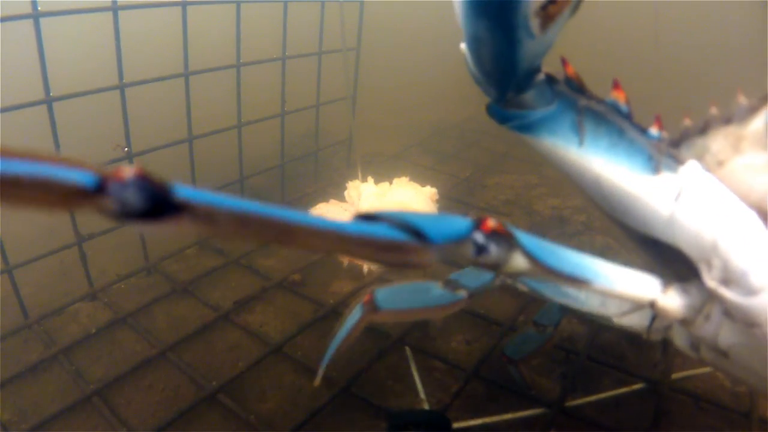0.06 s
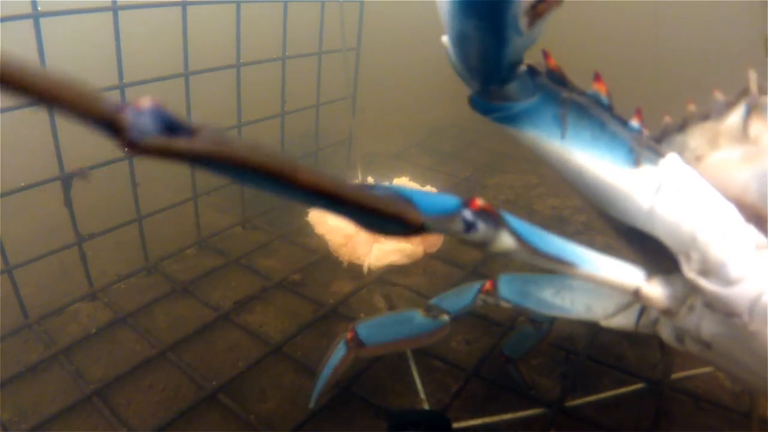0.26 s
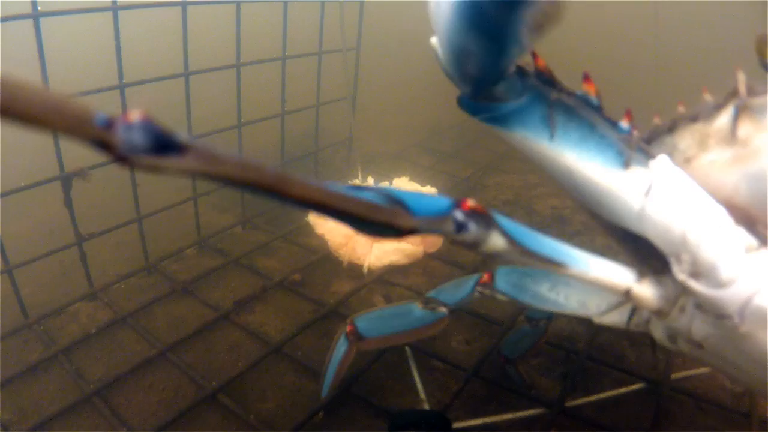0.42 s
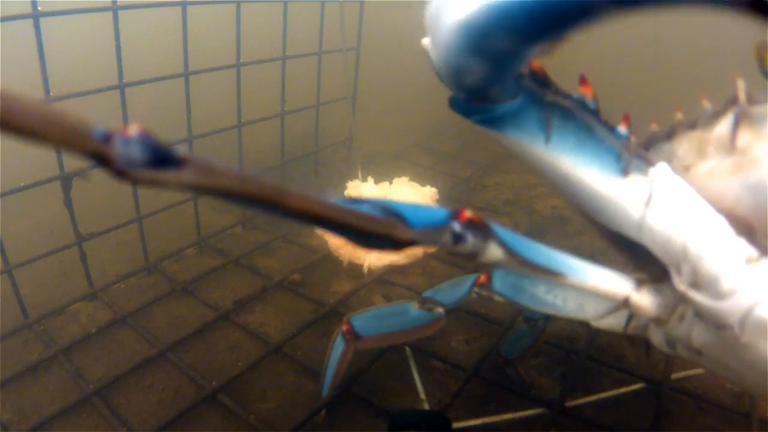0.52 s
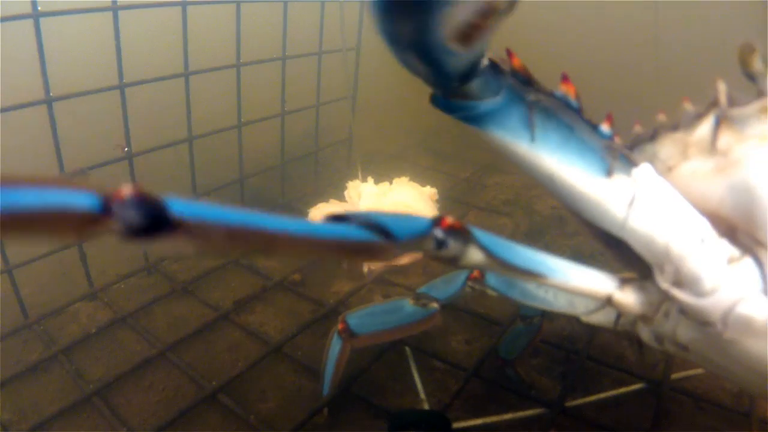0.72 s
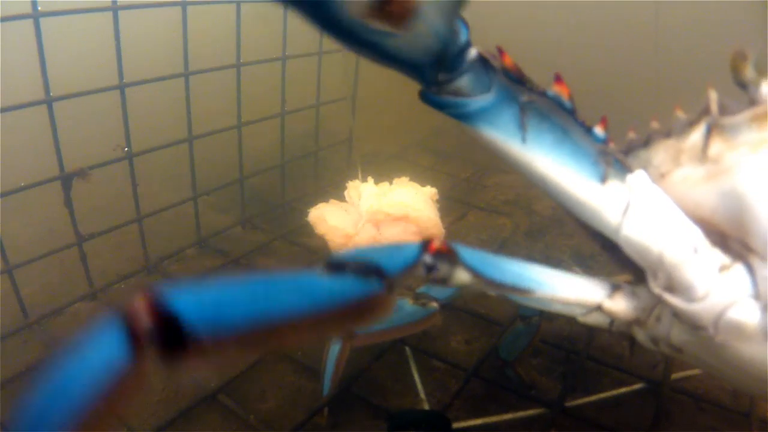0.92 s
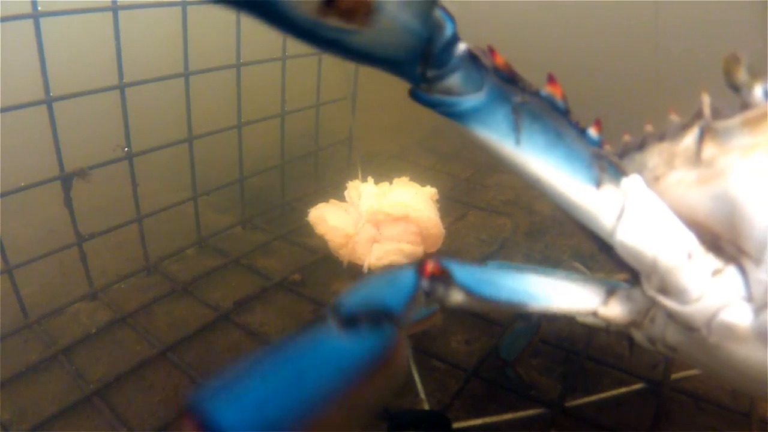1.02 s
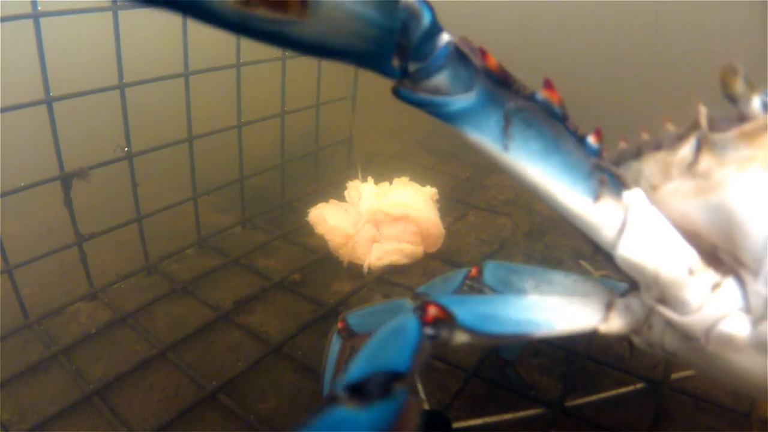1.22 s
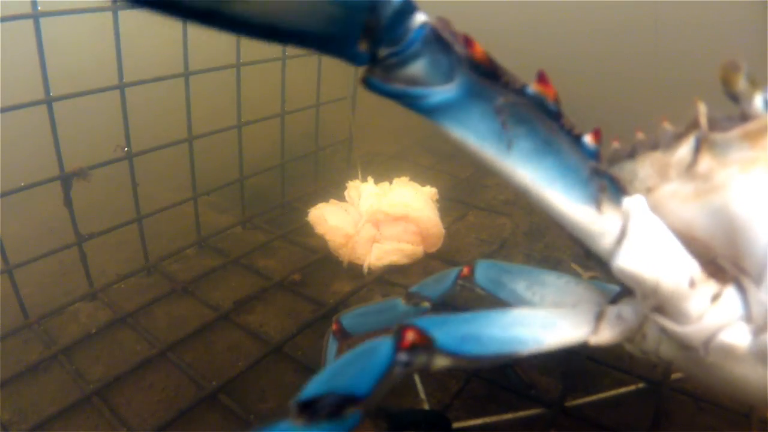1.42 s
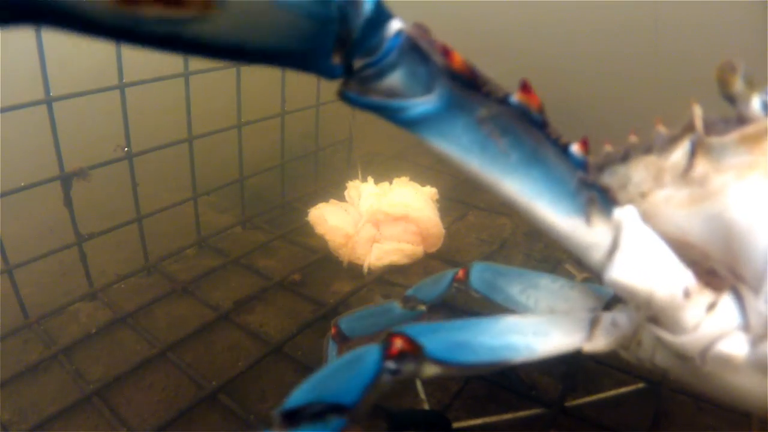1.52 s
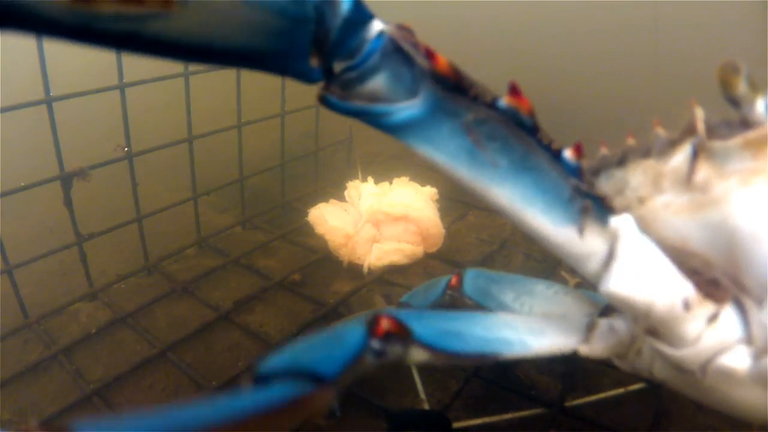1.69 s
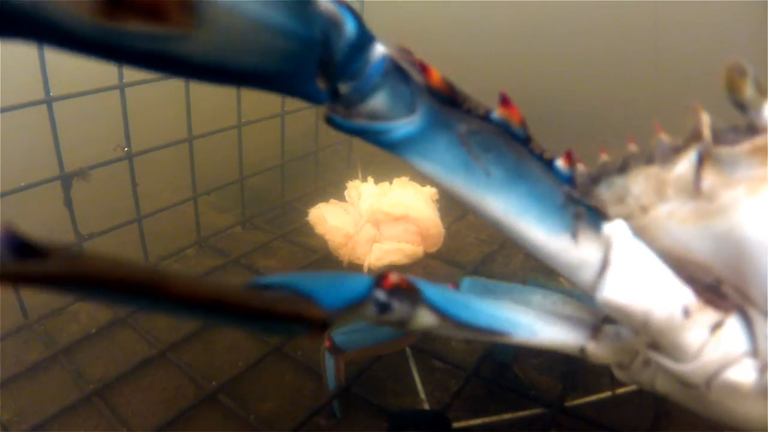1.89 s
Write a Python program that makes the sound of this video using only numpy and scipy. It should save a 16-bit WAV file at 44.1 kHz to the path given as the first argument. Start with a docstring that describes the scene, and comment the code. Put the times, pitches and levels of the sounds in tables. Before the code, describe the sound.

Sharp, hollow knocks come unevenly as a crab climbs over the plastic case around the microphone, with brief leg chirps and brushes, then a rasp of shell. Behind them a wire trap hums faintly in a soft underwater wash.

```python
"""Sharp, hollow taps and scrapes, very close: under water, a crab in a wire trap walks over a plastic
camera housing, heard from inside it. Each tap rings the housing for a few milliseconds, coloured by
where and how hard the shell lands. Leg tips stick and slip in short chirps, legs brush the case and
the shell grates along it. Behind them the shaken trap rings faintly and hums over a wash of water."""
import sys
import numpy as np
from scipy import signal
from scipy.fft import rfft, irfft, next_fast_len
from scipy.io import wavfile

SR = 44100
rng = np.random.default_rng(int(sys.argv[2]) if len(sys.argv) > 2 else 0)


def generate_wav(sig):
    """Save sig (samples, or channels by samples) to the path in sys.argv[1] as 16-bit PCM at SR."""
    pcm = np.round(np.clip(np.atleast_2d(sig).T, -1, 1) * 32767).astype(np.int16)
    wavfile.write(sys.argv[1], SR, pcm)


N = 85995
TAP_S, LEVEL_WINDOW_S = .09, .01  # length of one contact; its level is its energy spread over the window


def amp(db):
    """Decibels to gain."""
    return 10 ** (np.asarray(db, float) / 20)


def unit(x):
    """Scale to an energy of 1."""
    return x / np.sqrt(np.sum(x ** 2) + 1e-20)


def fade(t, t60):
    """Exponential decay, 60 dB down after t60."""
    return np.exp(-np.log(1000) * t / t60)


def through(x, response):
    """Play x through an impulse response."""
    return signal.fftconvolve(x, response)[:len(x)]


def low_cut(x, edge_hz):
    """Roll off the lows below an edge."""
    return signal.sosfilt(signal.butter(3, edge_hz, "highpass", fs=SR, output="sos"), x)


def colour(x, curve):
    """Minimum-phase EQ that follows a curve of (f/Hz, gain/dB) points."""
    size = 2 * next_fast_len(len(x))
    hz, db = np.array(curve, float).T
    bin_hz = np.arange(size // 2 + 1) * SR / size
    gain = amp(np.interp(np.log(bin_hz + 1), np.log(hz), db))
    cepstrum = irfft(np.log(gain))
    cepstrum[1:size // 2] *= 2  # folded forward, so nothing rings ahead of the attack
    cepstrum[size // 2 + 1:] = 0
    return irfft(rfft(x, size) * np.exp(rfft(cepstrum)))[:len(x)]


def ring(modes, length_s, scatter_db=0):
    """Decaying modes after one push, with an optional random spread in level."""
    t = np.arange(int(length_s * SR)) / SR
    out = np.zeros(len(t))
    for hz, db, t60 in modes:
        partial = unit(np.sin(2 * np.pi * hz * t) * fade(t, t60))
        out -= amp(db + scatter_db * rng.standard_normal()) * partial
    return out


def burst(curve, t60, length_s):
    """Resonances too dense to tell apart: coloured noise that dies away."""
    t = np.arange(int(length_s * SR)) / SR
    return unit(colour(rng.standard_normal(len(t)) * fade(t, t60), curve))


def stroke(t, swell, release, rise_db=12, fall_db=26):
    """Pressure of a moving leg: up by rise_db over the swell, then down by fall_db per release time."""
    return amp(-np.maximum(rise_db * (1 - t / swell), fall_db * (t - swell) / release))


def add(out, start, x):
    """Mix x in at a start time in seconds."""
    i = max(int(start * SR), 0)
    out[i:i + len(x)] += x[:max(len(out) - i, 0)]


# EQ of still water and hiss: f/Hz, gain/dB
WATER_EQ = [(25, 4.5), (76, 7.5), (120, 3), (200, -5), (600, -18.5), (1200, -17), (2400, -21),
            (6000, -33), (13000, -32.5), (16000, -42)]


def water(level_db=-64):
    """The bed: a faint, steady wash of dark noise."""
    return amp(level_db) * np.sqrt(N) * unit(colour(rng.standard_normal(N), WATER_EQ))


# jolts of the whole trap: t/s, hum level/dB
TRAP_JOLTS = [(.22, -47), (.87, -52), (.955, -61), (1.165, -32.5), (1.32, -54), (1.385, -45.5),
              (1.465, -53.5), (1.69, -52)]


def trap_hum(hz=78.2, rise_s=.021, t60=.8):
    """The whole trap hums on one low note that blooms and fades after each jolt."""
    t = np.arange(N) / SR
    envelope = np.zeros(N)
    for start, db in TRAP_JOLTS:
        age = np.maximum(t - start, 0)
        envelope += amp(db) * (1 - np.exp(-age / rise_s)) * fade(age, t60)
    return np.sqrt(2) * envelope * np.sin(2 * np.pi * hz * t)


# EQ of the wire mesh's dense tail: f/Hz, gain/dB
MESH_EQ = [(60, -14), (110, -12), (170, 3.5), (400, 1), (650, -5.5), (1000, -7), (1500, -16), (2300, -19.5),
           (3500, -20.5), (6000, -36), (11000, -5.5), (15000, -19)]
# clearest notes in that tail: f/Hz, level/dB, t60/s
MESH_NOTES = [(483.3, -17, 0.23), (595.8, -6, 0.18), (723, -9, 0.11), (958, -13, 0.17), (1260, -18.5, .15)]


def wire_mesh(shake, return_db=-14.5):
    """The mesh rings on after each blow, like a faint metallic reverb."""
    tail = burst(MESH_EQ, t60=.76, length_s=1) + ring(MESH_NOTES, length_s=1)
    return amp(return_db) * through(shake, tail)


# soft brushes of a leg: t/s, swell/s, release/s, rub level/dB, scratch level/dB
SCUFF_CUES = [(0, 0.0049, .008, -48.5, -51.5), (0.02, 0.013, 0.018, -53.5, -53.5),
              (0.19, 0.021, 0.028, -46.5, -64.5), (0.264, 0.034, 0.022, -80, -58),
              (.358, 0.0044, 0.022, -64.5, -62.5), (0.41, 0.011, 0.0041, -33, -57),
              (0.445, 0.0074, 0.0099, -55, -45.5), (0.4651, .001, 0.018, -64, -44.5),
              (.605, 0.0034, 0.017, -36.5, -63), (0.742, 0.033, 0.09, -54, -84),
              (0.789, 0.0036, 0.069, -52.5, -56.5), (0.799, 0.0031, 0.074, -47.5, -75.5),
              (.90, 0.041, 0.056, -48, -66), (1.171, 0.0047, 0.054, -31, -47),
              (1.85, 0.0048, 0.012, -50, -58), (1.874, 0.0065, .008, -59, -72)]
# EQs of the dull rub and of the fine scratch: f/Hz, gain/dB
RUB_EQ = [(60, -23.5), (170, -1.5), (300, 3.5), (450, -9), (620, 1), (900, -13), (2000, -43), (5000, -89)]
SCRATCH_EQ = [(150, -27), (600, -8), (1300, 5.5), (2300, 7), (3200, -7.5), (3900, -3), (5500, -19),
              (8000, -19.5), (10000, -9), (13000, -9), (14700, -26), (16000, -43)]


def scuffs():
    """A leg brushes the case too lightly to catch: a dull rub with a fine scratch on top."""
    out, t = np.zeros(N), np.arange(N // 12) / SR
    for start, swell, release, rub_db, scratch_db in SCUFF_CUES:
        rub = amp(rub_db) * unit(colour(rng.standard_normal(len(t)), RUB_EQ))
        scratch = amp(scratch_db) * unit(colour(rng.standard_normal(len(t)), SCRATCH_EQ))
        add(out, start, (rub + scratch) * np.sqrt(len(t)) * stroke(t, swell, release))
    return out


# pitched accents on a few taps: t/s, f/Hz, level/dB, t60/s
PING_CUES = [(0.0101, 312, -35, 0.039), (.116, 322, -50.5, 0.035), (.2275, 719, -19.5, 0.015),
             (.229, 890, -53, 0.75), (.332, 2617, -37, 0.019), (0.61, 290, -59, 0.015),
             (.8525, 692, -36.5, 0.086), (1.5466, 1800, -26.5, 0.015)]


def pings():
    """A hollow leg segment or a plucked wire rings at its own pitch."""
    out = np.zeros(N)
    for start, hz, db, t60 in PING_CUES:
        add(out, start, ring([(hz, db, t60)], length_s=.5) * np.sqrt(LEVEL_WINDOW_S * SR))
    return low_cut(out, edge_hz=180)


# leg-tip chirps: t/s, swell/s, release/s, bright level/dB, body against bright/dB, slip rate/Hz
CHIRP_CUES = [(0.552, 0.0035, .005, -49, 22, 600), (0.563, 0.017, .014, -46.5, 7, 990),
              (.625, 0.041, .015, -56.5, 0, 400), (0.661, 0.0079, 0.0052, -44.5, -8, 800),
              (.673, 0.014, .011, -35, -6, 990), (0.8508, 0.0006, .004, -29.5, -7.5, 1550),
              (0.894, 0.027, .008, -55, 0, 570), (1.254, 0.0054, .005, -35.5, 2.5, 490),
              (1.305, 0.0057, .007, -41.5, 8.5, 830)]
# low and high modes that a slipping tip rings: f/Hz, relative level/dB, t60/s
TIP_BODY_MODES = [(595, 0, .025), (680, -1, .028)]
TIP_BRIGHT_MODES = [(1356, -4, 0.013), (2450, -2.5, 0.03), (3732, 2.5, 0.021), (8200, -4, 0.019),
                    (12000, -15, .02), (13000, -17.5, 0.018)]
# EQ of the tip's rasp: f/Hz, gain/dB
RASP_EQ = [(200, -29), (700, 7.5), (1200, -0.5), (1700, -4.5), (2000, -18), (2600, -12), (3300, -19),
           (4700, -23), (6000, -20), (8000, -14.5), (10000, -22), (13500, -26), (16000, -40.5)]


def chirps(slip_count=120, jitter=.15, scatter_db=4, rasp_db=2.5, edge_hz=560):
    """A leg tip sticks and slips: a run of uneven pulses swells and lets go, ringing its modes."""
    out = np.zeros(N)
    for start, swell, release, db, body_db, rate in CHIRP_CUES:
        gap_spread, force_spread = rng.standard_normal((slip_count, 2)).T
        slip_times = np.concatenate([[0], np.cumsum(np.exp(jitter * gap_spread[1:]))]) / rate
        force = amp(scatter_db * force_spread) * stroke(slip_times, swell, release)
        slips = np.bincount((slip_times * SR).astype(int), weights=force, minlength=N // 4)
        high_ring = ring(TIP_BRIGHT_MODES, TAP_S)
        rasp = amp(rasp_db) * burst(RASP_EQ, t60=.034, length_s=TAP_S)
        bright = unit(low_cut(through(slips, high_ring + rasp), edge_hz))
        body = unit(low_cut(through(slips, ring(TIP_BODY_MODES, TAP_S)), edge_hz))
        add(out, start, amp(db) * np.sqrt(LEVEL_WINDOW_S * SR) * (bright + amp(body_db) * body))
    return out


# fader ride of the shell's drag along the case: t/s, level/dB
GRATE_RIDE = [(1.457, -81), (1.468, -30.5), (1.493, -45), (1.529, -37.5), (1.575, -63), (1.605, -37),
              (1.66, -42), (1.722, -53), (1.78, -53.5), (1.815, -94), (1.875, -58.5), (1.908, -98)]


def grating(points=3, catches_per_s=560, scatter_db=4.5):
    """Rough shell drags over the case at a few points: dense little catches, each ringing it."""
    times, levels_db = np.array(GRATE_RIDE).T
    pressure = np.interp(np.arange(N) / SR, times, amp(levels_db), left=0)
    out = np.zeros(N)
    for _ in range(points):
        catches = rng.random(N) < catches_per_s / points / SR
        strength = amp(scatter_db * np.clip(rng.standard_normal(N), -2, 2))
        polarity = rng.choice([-1, 1], N)
        force = np.sqrt(N / points) * unit(catches * strength) * polarity * pressure
        case = housing_knock(levels_db=[-8, 1.5, -4.5, -7.5, -23.5, -17], edge_hz=93)
        out += through(force, unit(case))
    return out


# modes of the plastic housing: f/Hz, relative level/dB, t60/s
HOUSING_MODES = [(202, -14.5, 0.031), (326, -3.5, 0.009), (598, 0.5, 0.017), (681, -7, 0.034),
                 (740.5, -13.5, 0.066), (862, -10.5, 0.0095), (944.6, -1.5, 0.023), (1290, -17, 0.035),
                 (1480, -10.5, .007), (1740, -12, 0.011), (2217, -13, .026), (2620, -24, 0.021)]
# EQ of the crack, the case's dense upper resonances: f/Hz, gain/dB
CRACK_EQ = [(100, -18), (600, -16), (1000, 10), (2000, 5.5), (3300, -8), (4800, -11), (5500, -28),
            (6200, -29), (7400, -16.5), (8700, -20.5), (10500, -16), (12700, -13.5), (14500, -19),
            (15500, -29.5), (16300, -32)]
# bands of a knock (thud, hollow knock, wall ring, crack, snap, tick): low f/Hz, high f/Hz
KNOCK_BANDS = [(100, 450), (450, 800), (800, 1400), (1400, 2900), (2900, 5500), (7000, 16000)]


def housing_knock(levels_db, edge_hz, eq_passes=3):
    """One contact rings the housing; smooth EQ pulls each band towards its given level."""
    body = ring(HOUSING_MODES, TAP_S, scatter_db=1.5)
    crack = amp(-1.5) * burst(CRACK_EQ, t60=.016, length_s=TAP_S)
    knock = low_cut(body + crack, edge_hz)
    hz = np.arange(len(knock) // 2 + 1) * SR / len(knock)
    for _ in range(eq_passes):
        power = 2 * np.abs(rfft(knock)) ** 2 / (len(knock) * LEVEL_WINDOW_S * SR)
        curve = []
        for (low, high), db in zip(KNOCK_BANDS, levels_db):
            band_db = 10 * np.log10(power[(hz >= low) & (hz < high)].sum())
            curve.append((np.sqrt(low * high), db - band_db))
        knock = colour(knock, curve)
    return knock


# leg hits: t/s, thud/dB, hollow knock/dB, wall ring/dB, crack/dB, snap/dB, tick/dB,
# low cut/Hz (lower as the whole case gives), send to the mesh/dB
TAP_CUES = [(0.011, -39, -35, -45.5, -53.5, -70, -56.5, 266, -38.5),
            (0.117, -63, -57.5, -64, -73, -88, -75, 284, -34),
            (0.2102, -39.5, -22.5, -36, -37.5, -51, -45, 131, -29.5),
            (0.217, -22, -17.5, -28, -30, -32, -36.5, 92, -32.5),
            (0.2268, -27.5, -22, -41.5, -33, -39.5, -37.5, 30.5, -51),
            (0.253, -79, -76, -59, -56, -70, -67.5, 130, -27),
            (0.2915, -77, -76, -55.5, -50, -58, -58.5, 130, -24),
            (0.3327, -52, -41.5, -57.5, -43.5, -45.5, -45.5, 130, -19),
            (0.421, -37, -39, -62, -55, -76, -60, 224.5, -42),
            (0.4242, -35, -33.5, -57.5, -53, -66.5, -57, 218, -47),
            (0.433, -33.5, -35.5, -51.5, -59, -71, -58, 224, -29),
            (0.445, -42, -55, -46, -47, -55, -57, 131.4, -18),
            (0.5916, -18.5, -15, -30.5, -38.5, -42, -37.5, 23.1, -33.5),
            (0.6093, -36.5, -46, -67, -75, -79, -85, 247, -42),
            (0.874, -50.5, -45, -47, -36, -48.5, -48.5, 130, -2),
            (0.9522, -40.5, -21, -43, -44.5, -49, -71, 132, -39),
            (0.9563, -26, -23.5, -28, -36, -54, -42.5, 91.4, -21.5),
            (1.165, -23.5, -20.5, -27.5, -32.5, -50, -41, 112.6, -25),
            (1.2809, -59, -40, -43, -40.5, -48, -48, 130, -10),
            (1.2961, -32.5, -31.5, -26.5, -28, -38.5, -37, 136, -18.5),
            (1.3198, -25.5, -20.5, -17.5, -22.5, -32, -33.5, 134, -40),
            (1.3614, -38.5, -60, -35.5, -36, -44, -47, 133, -6),
            (1.3718, -38, -28.5, -27, -30, -42.5, -39.5, 130, -18.5),
            (1.3811, -25.5, -21.5, -18.5, -24, -32.5, -33.5, 140, -24.5),
            (1.462, -41, -51, -37, -36.5, -47, -48, 131, 1.5),
            (1.4741, -53.5, -43, -37, -37.5, -52.5, -47, 139, 0),
            (1.5465, -35.5, -33.5, -25.5, -24.5, -39, -32.5, 50, -25.5),
            (1.5476, -50, -34, -70.5, -48.5, -46, -53, 132, -19),
            (1.6045, -38, -50, -38, -47, -60, -56, 128, -3),
            (1.609, -51.5, -44, -70, -73, -67, -58.5, 128, -8),
            (1.6375, -55, -42.5, -52, -58, -73, -63, 124.4, -1),
            (1.688, -38, -34.5, -26.5, -33, -51, -43.5, 125, -41),
            (1.8416, -66, -51.5, -48.5, -52.5, -95.5, -64, 120.4, -23.5),
            (1.8522, -56, -50, -44.5, -43.5, -84, -56, 130, -30.5)]


def taps():
    """Legs strike the housing; returns the direct knocks and the send that shakes the trap."""
    direct, shake = np.zeros(N), np.zeros(N)
    for start, *levels_db, edge_hz, send_db in TAP_CUES:
        knock = housing_knock(levels_db, edge_hz)
        add(direct, start, knock)
        add(shake, start, knock * amp(send_db))
    return direct, shake


# treble resonances of the air gap, mixed in parallel: f/Hz, width/Hz, level/dB
GAP_RESONANCES = [(9730, 110, 6.5), (10790, 160, 1.5), (11390, 160, 5), (11430, 67, -20),
                  (11700, 200, -10.5), (12700, 160, 0)]
# notches of the air gap, the upper pair overlapping: f/Hz, width/Hz
GAP_NOTCHES = [(6100, 1500), (11950, 650), (11980, 650)]


def air_gap(x):
    """The gap before the microphone lifts some treble resonances and has two dead spots."""
    out = x.copy()
    for hz, width, db in GAP_RESONANCES:
        out += amp(db) * signal.lfilter(*signal.iirpeak(hz, hz / width, fs=SR), x)
    for hz, width in GAP_NOTCHES:
        out = signal.lfilter(*signal.iirnotch(hz, hz / width, fs=SR), out)
    return out


def scene(grate_send_db=-11.5):
    """Mono mix: crab and trap reach the microphone through the air gap, over the water bed."""
    knocks, shake = taps()
    grate = grating()
    crab = knocks + pings() + chirps() + scuffs() + grate
    trap = wire_mesh(shake + amp(grate_send_db) * grate) + trap_hum()
    return (air_gap(crab + trap) + water())[None]


def record(dry, ceiling=.33, knee=6, top_hz=15900):
    """The camera flattens the hardest knocks and cuts the top."""
    limited = dry / (5 + np.abs(dry / ceiling) ** knee) ** (1 / knee)
    return signal.sosfilt(signal.ellip(8, .2, 80, top_hz, fs=SR, output="sos"), limited)


dry = scene()
out = record(dry)
generate_wav(out)
```